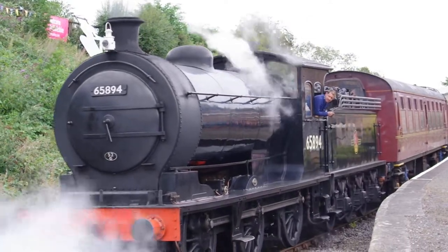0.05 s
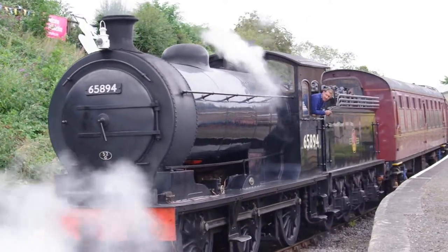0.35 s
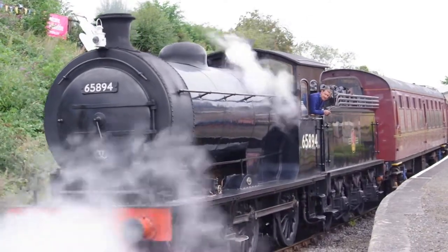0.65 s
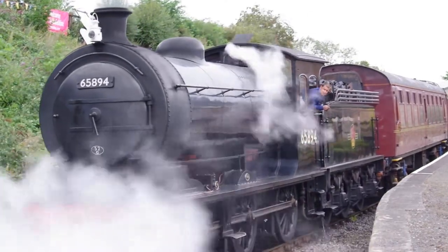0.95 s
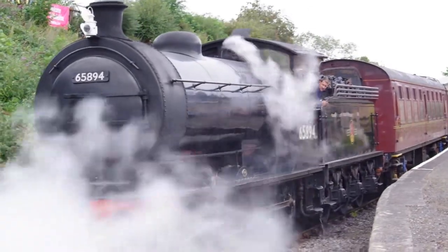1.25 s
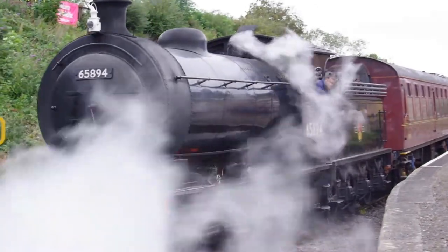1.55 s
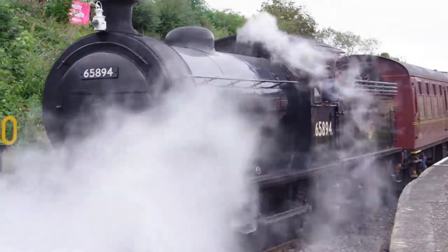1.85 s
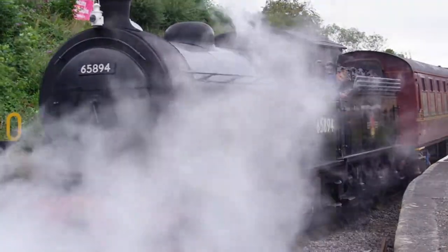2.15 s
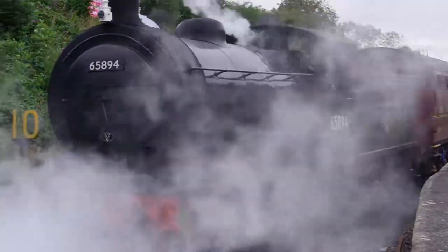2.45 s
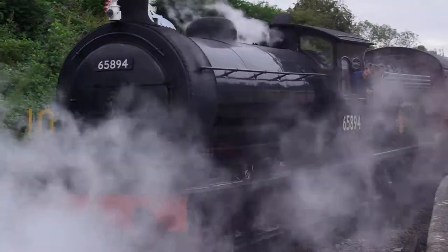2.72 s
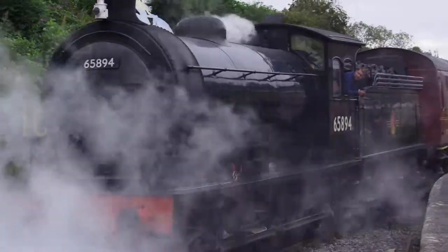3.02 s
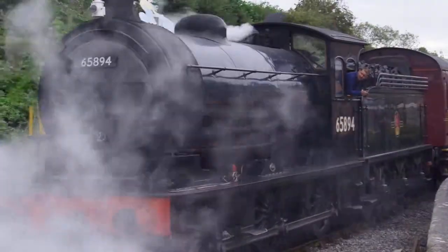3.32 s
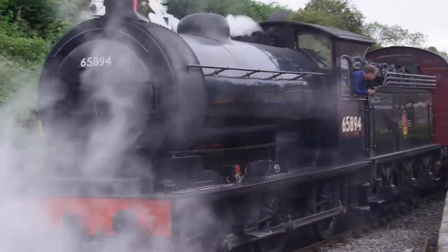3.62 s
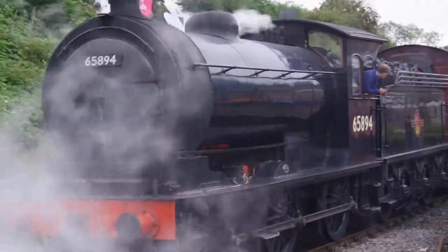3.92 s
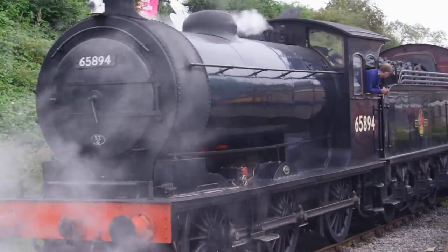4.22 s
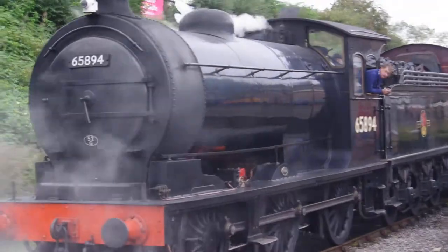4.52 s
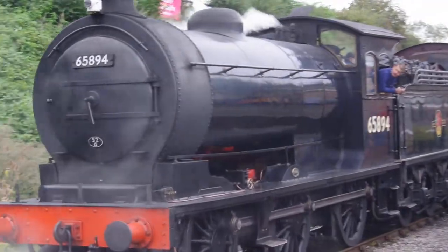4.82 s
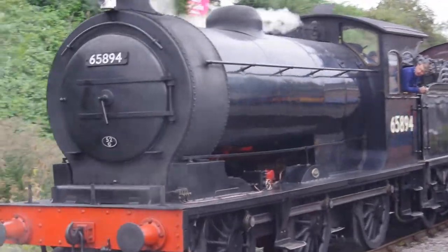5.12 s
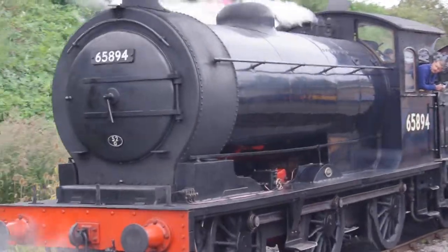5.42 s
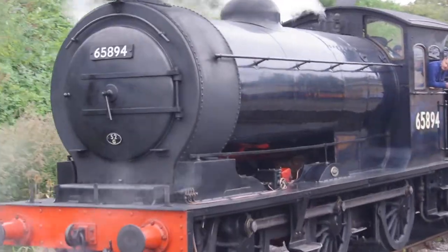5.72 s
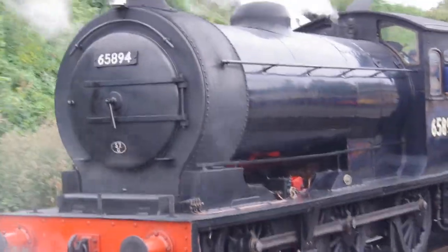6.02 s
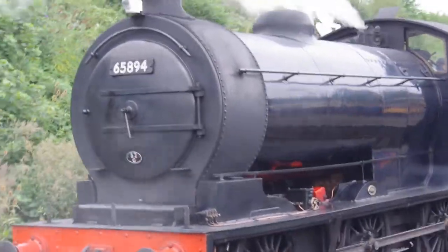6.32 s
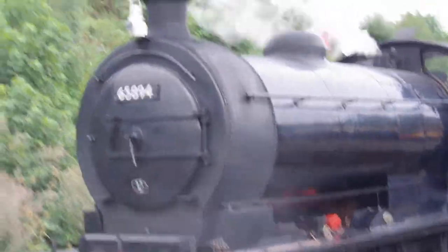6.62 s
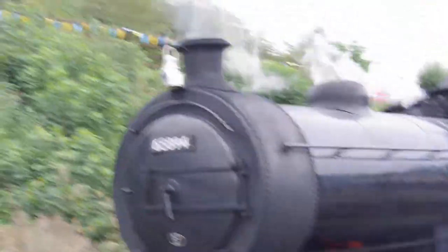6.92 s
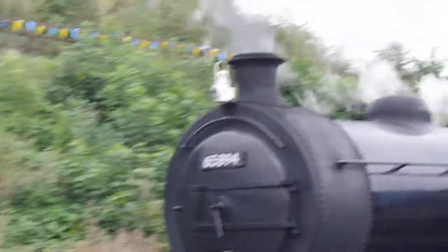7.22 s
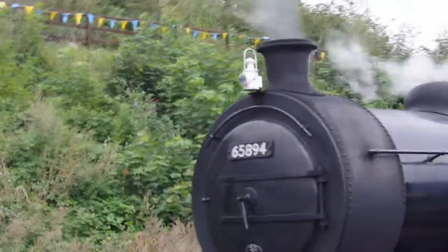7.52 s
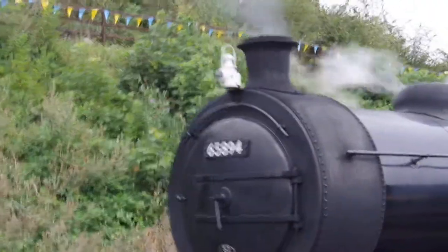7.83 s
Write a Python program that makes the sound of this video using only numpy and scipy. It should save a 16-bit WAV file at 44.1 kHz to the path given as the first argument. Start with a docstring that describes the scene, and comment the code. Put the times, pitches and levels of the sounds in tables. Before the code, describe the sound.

A steam locomotive hisses sharply with wind buffeting the microphone, cuts off, then a steady steam rush returns with slow, booming chuffs.

```python
"""A sharp, dry hiss of steam, close by at the trackside in a cutting: a locomotive is pulling away with
its cylinder drain cocks open. Water turns the jets wet and roaring, and their cloud buffets the stereo
microphone. The cocks shut; a steady hollow rush of steam and a low rumble fade up out of the lull, and
slow exhaust chuffs boom in the chimney as the engine draws level."""
import sys
import numpy as np
from scipy import signal
from scipy.fft import rfft, irfft, next_fast_len
from scipy.io import wavfile
from scipy.ndimage import uniform_filter1d, map_coordinates

SR = 44100
rng = np.random.default_rng(int(sys.argv[2]) if len(sys.argv) > 2 else 0)


def master(y):
    """Save y as 16-bit WAV."""
    cut = np.clip(np.atleast_2d(y).T, -1, 1)
    pcm = np.round(cut * 32767)  # scale
    wavfile.write(sys.argv[1], SR, pcm.astype(np.int16))


N = 355446

# exhaust beats: centre_s, length_s, puff_db, boom_lag_s, boom_length_s, boom_db, echo_db
EXHAUST_BEATS = [(5.11, 0.062, -35, .01, 0.057, -29.5, -8), (6.125, 0.037, -25.5, 0.023, .023, -9, -5),
                 (7.056, .03, -20.5, 0.038, .015, -16.5, -20), (7.945, 0.053, -27, .026, 0.027, -17.5, -22)]
# how alike the steam is at the two microphone ports: frequency_hz, correlation
STEAM_LIKENESS = [(60, 1), (300, 0.99), (640, 0.96), (1400, 0.76), (3100, 0.68), (6800, 0.71), (9000, 0.42),
                  (15000, 0.2)]
COCKS_CLOSING_S, COCKS_SHUT_S = 3.82, 4.14


def amp(db):
    """Decibels to gain."""
    return np.exp(np.asarray(db) * (np.log(10) / 20))


def unit(pair):
    """Scale a stereo pair so that its middle has rms 1."""
    return pair / np.sqrt(np.mean(pair.mean(0) ** 2) + 1e-20)


def even(pair):
    """Hold a noise at rms 1 while its colour changes."""
    power = uniform_filter1d(pair.mean(0) ** 2, size=SR // 8)
    return pair / np.sqrt(np.abs(power) + 1e-12)


def along(points, hz):
    """Interpolate (frequency_hz, value) points on a log axis."""
    point_hz, values = np.transpose(points)
    return np.interp(np.log(hz + 1), np.log(point_hz + 1), values)


def clock():
    """Time of every sample in seconds."""
    return np.arange(N) / SR


def curves(rows):
    """One value per sample for each column after the time."""
    time_s, *columns = np.transpose(rows)
    return [np.interp(clock(), time_s, column) for column in columns]


def ramp(end_s, length_s):
    """Rises evenly from 0 to 1, arriving at end_s."""
    return np.clip(1 + (clock() - end_s) / length_s, 0, 1)


def swell(centre_s, length_s):
    """A bell-shaped surge."""
    return np.exp(-np.minimum(((clock() - centre_s) / length_s) ** 2, 20))


def wobble(rate_hz):
    """A smooth random curve, rate_hz knots a second."""
    coarse_s = np.linspace(0, N / SR, N // 20)
    knots = rng.standard_normal(int(N * rate_hz / SR) + 4)
    return np.interp(clock(), coarse_s, map_coordinates(knots, [coarse_s * rate_hz]))


def filtered(x, response):
    """Filter x by a gain that is a function of frequency."""
    size = next_fast_len(N + 8192)
    return irfft(rfft(x, size) * response(np.fft.rfftfreq(size, 1 / SR)), size)[..., :N]


def split(x, edge_hz, order=8):
    """The parts of x below and above an edge, each at rms 1."""
    low = filtered(x, lambda hz: 1 / (1 + (hz / edge_hz) ** order))
    return unit(low), unit(x - low)


def eddies(patchy_db, bins, frames):
    """Two noises whose gain wanders in patches of frequency and time."""
    spectra = signal.stft(rng.standard_normal((2, N)), nperseg=1024)[2]
    patches = uniform_filter1d(rng.standard_normal(spectra.shape[1:]), bins, axis=0)
    patches = uniform_filter1d(patches, frames, axis=1)
    return signal.istft(spectra * amp(patchy_db * patches / patches.std()), nperseg=1024)[1][:, :N]


def rush(source, colour, likeness, lead=None):
    """Colour two noises and spread them over the microphone ports."""
    # imbalance of the two ports: frequency_hz, left_minus_right_db
    port_balance = [(100, 0.5), (700, 0), (1400, 0.5), (2500, -4), (4400, 1.5), (5600, -2.5), (6700, -3.5),
                    (7400, -11), (8400, -12.5), (9400, -11.5), (10500, -1), (12000, -2.5), (13500, 2.5),
                    (15500, 7)]
    size = next_fast_len(N + 8192)
    hz = np.fft.rfftfreq(size, 1 / SR)
    correlation = np.clip(along(likeness, hz), -1, 1)
    coloured = rfft(source, size) * amp(along(colour, hz))
    mid, side = coloured * np.sqrt([1 + correlation, 1 - correlation])
    left = amp(along(port_balance, hz) / 2)  # the right port gets the inverse gain and phase
    if lead is not None:
        left = left * np.exp(.5j * along(lead, hz))
    ports = np.array([(mid + side) * left, (mid - side) / left])
    return unit(irfft(ports, size)[:, :N])


def drain_cocks():
    """Jets blast along the track: water makes them roar, turbulence shifts their colour."""
    # water carried by the jets: time_s, wet_share
    water = [(0, 0), (1.0, 0), (1.27, 0.75), (1.5, 0.7), (2.4, 0.85), (3.3, 0.7), (3.5, 0.2), (3.82, 0),
             (4.1, 1)]
    # spectrum of a dry jet: frequency_hz, level_db
    dry_colour = [(100, -32), (550, -22.5), (1050, -20.5), (1450, -12), (2700, -9.5), (3450, -10),
                  (3950, -5), (5500, -4), (6600, 0), (7300, -5.5), (8300, 2.5), (9500, -7.5), (10400, -8.5),
                  (12000, -16), (15500, -20.5)]
    # spectrum of a wet jet: frequency_hz, level_db
    wet_colour = [(100, -25), (550, -38), (1050, -26.5), (1400, -17), (2100, -8.5), (2700, -5.5),
                  (3700, -6), (5500, -2.5), (6600, 2), (7300, -3.5), (8400, -1.5), (9600, -3.5),
                  (10500, -2), (13000, -15), (15500, -19.5)]
    # how alike the jets are at the two ports: frequency_hz, correlation
    likeness = [(300, 0.2), (1400, 0.96), (3100, 0.63), (6800, 0.78), (8500, 0.59), (14000, 0.53)]
    # phase by which the left port leads: frequency_hz, lead_rad
    lead = [(4700, 0), (7000, -.5), (8100, 0.9), (8500, 2), (9600, 2.4), (13000, 2.5)]
    # the jets' treble while the cocks are open: time_s, hiss_db, fizz_db
    treble_levels = [(0.0, -22, -34.5), (0.28, -20.5, -31.5), (0.69, -23.5, -33), (0.75, -19, -29.5),
                     (0.95, -20, -32.5), (1.0, -24, -34.5), (1.21, -23.5, -35), (1.24, -19, -33.5),
                     (1.42, -22, -31), (2.43, -21, -29.5), (2.95, -21, -31.5), (3.13, -19, -27.5),
                     (3.31, -19.5, -28), (3.46, -19, -37.5), (3.74, -16, -29.5), (3.82, -16.5, -33)]
    roar_fall_db_per_s, hiss_fall_db_per_s, fizz_fall_db_per_s = 77, 85, 62
    closing_s = np.maximum(clock() - COCKS_CLOSING_S, 0)
    wet = np.clip(curves(water)[0], 0, 1)
    spurt_db = 4 * swell(1.27, 0.049)  # the first water is thrown out at once
    roar_db = -33.5 + 4.5 * wet + spurt_db - roar_fall_db_per_s * closing_s
    hiss_db, fizz_db = curves(treble_levels)
    hiss_db = hiss_db + 0.57 * wobble(9) - hiss_fall_db_per_s * closing_s
    fizz_db = fizz_db + 1.26 * wobble(11) - fizz_fall_db_per_s * closing_s
    turbulence = eddies(patchy_db=2.5, bins=3, frames=26)
    dry_jet = rush(turbulence, dry_colour, likeness, lead)
    wet_jet = rush(turbulence, wet_colour, likeness, lead)
    roar, treble = split((1 - wet) * dry_jet + wet * wet_jet, edge_hz=3300)
    hiss, fizz = split(treble, edge_hz=9730, order=24)
    jet = amp(roar_db) * even(roar) + amp(hiss_db) * even(hiss) + amp(fizz_db) * even(fizz)
    sputter_db = 0.38 * wobble(29.96) + 0.19 * wobble(130)  # slugs of water break up the flow
    last_gap = 1 - ramp(COCKS_SHUT_S, length_s=0.087)
    return last_gap * amp(sputter_db) * jet


def singing():
    """A weak, breathy note rides on the escaping steam and fades as the jets turn wet."""
    pitch_hz, half_width_hz, level_db = 650, 19, -50
    breath = rng.standard_normal((1, N))
    note = filtered(breath, lambda hz: 1 / (1 + ((hz - pitch_hz) / half_width_hz) ** 2))
    return amp(level_db) * (1 - ramp(end_s=2.1, length_s=.55)) * unit(note)


def buffeting():
    """The steam cloud hits each port separately, the left harder; the draught ends as the cocks shut."""
    # billows blowing over the microphone: centre_s, length_s, level_db
    billows = [(.01, 0.038, -31.5), (0.154, 0.11, -37), (0.58, 0.14, -35.5), (0.938, 0.053, -45),
               (1.237, 0.082, -32.5), (1.5, 0.13, -47.5), (1.755, 0.16, -40.5), (2.043, 0.24, -49),
               (2.866, 0.077, -45.5)]
    # spectrum of wind on the ports: frequency_hz, level_db
    wind_colour = [(20, -8), (60, -2), (110, -0.5), (250, 0), (400, -5.5), (650, -8), (1000, -14),
                   (2200, -42)]
    gusts = rush(rng.standard_normal((2, N)), wind_colour, likeness=[(100, .02), (700, 0.18)])
    lumps = amp(2.2 * np.array([wobble(35.2), wobble(35.1)]) + [[2.8], [-2.8]])
    draught = amp(-57.5) * (1 - ramp(COCKS_SHUT_S, length_s=0.38))
    surges = sum(amp(level_db) * swell(centre_s, length_s) for centre_s, length_s, level_db in billows)
    return (draught + surges) * unit(lumps * gusts)


def thumps():
    """Single eddies strike the microphone, from dull thuds to sharper slaps, mostly on the left port."""
    # strikes of air: centre_s, length_s, level_db, left_minus_right_db, slap_share
    strikes = [(0.541, .014, -31, 14, 0.5), (.69, .015, -39, 3, 0.7), (1.038, 0.014, -34, 9, 0.96),
               (1.264, 0.027, -34, 16, 1), (2.06, .045, -42, 3, 0), (2.25, 0.02, -41.5, 7, 0.4),
               (2.836, 0.016, -39, -6, .6), (2.91, .012, -39, -4, .5), (5.683, 0.042, -32, 12, 0),
               (5.853, 0.018, -16.5, 23, 0), (5.93, .03, -35, 12, 0), (7.31, 0.017, -27, 2, 0.7)]
    # spectrum of a dull thud: frequency_hz, level_db
    thud_colour = [(20, 0), (60, 2.5), (140, -4), (300, -6), (600, -13.5), (2000, -45), (6000, -70)]
    # spectrum of a sharp slap: frequency_hz, level_db
    slap_colour = [(30, -19), (150, -6), (330, 2), (700, -2), (1500, -16), (6000, -50)]
    air = rng.standard_normal((2, N))
    thud, slap = (rush(air, colour, likeness=[(100, 0.088)]) for colour in (thud_colour, slap_colour))
    out = np.zeros((2, N))
    for centre_s, length_s, level_db, left_db, slap_share in strikes:
        pan = amp([[left_db / 2], [-left_db / 2]])
        pan /= np.sqrt(np.mean(pan ** 2))
        strike = (1 - slap_share) * thud + slap_share * slap
        out += amp(level_db) * pan * swell(centre_s, length_s) * strike
    return out


def steady_steam():
    """Steam rushes through the smokebox's resonances under a bright leak; the colour turns as it nears."""
    # spectrum of the escaping steam: frequency_hz, level_db
    colour = [(20, -2.5), (100, -4), (260, -5.5), (430, -4.5), (700, -3.5), (1400, -6.5), (2400, -8.5),
              (4000, -9), (6000, -6.5), (7600, -7), (8600, 1), (10500, -6.5), (12500, -13), (15500, -24.5)]
    # phase by which the left port leads: frequency_hz, lead_rad
    lead = [(600, -0.022), (3000, -0.46), (6800, -1.33), (9000, -1.36), (15000, -1.4)]
    # resonances of smokebox and pipework: pitch_hz, width_hz, lift_ahead_db, lift_alongside_db
    pipes = [(334, 10.6, 5, 7), (424, 38, -16.5, -1.5), (500, 36, 2, 0.5), (562, 53, 4.5, 6.5),
             (694, 18, 4, 0.5), (832, 24.5, -21, -8), (881, 30, 7, 8), (1142, 90, 2, 6.5),
             (1550, 31, 0.5, 7), (1770, 29, 10, 7), (2036, 54, 6.5, 7.5), (2733, 185, 10, 9),
             (3243, 94, 6, 7), (4200, 370, -0.5, -2.5), (4980, 150, 9, 5), (5450, 170, 4.5, 2.5),
             (6880, 420, 0.5, 4)]
    # the engine draws level with the microphone: time_s, alongside_share
    approach = [(4.2, 0.1), (6.0, 0.15), (6.8, 0.37), (7.4, 1), (8.06, 1)]
    lull_s, full_s = 4.18, 5.655
    hollow_rise_db_per_s, hollow_ease_db_per_s = 18.5, 1.01
    leak_rise_db_per_s, leak_ease_db_per_s = 19, .6
    to_go_s = full_s - np.clip(clock(), lull_s, full_s)
    past_s = np.maximum(clock() - full_s, 0)
    # the hiss dips after each beat, deeper for a louder boom
    dip_db = sum(7 * np.sqrt(amp(boom_db)) * swell(beat_s + 0.056, 0.05)
                 for beat_s, *_, boom_db, _ in EXHAUST_BEATS)
    hollow_db = -22.5 - hollow_rise_db_per_s * to_go_s - hollow_ease_db_per_s * past_s - 0.23 * dip_db
    leak_db = -23 - leak_rise_db_per_s * to_go_s - leak_ease_db_per_s * past_s - dip_db
    steam = rush(eddies(patchy_db=2.17, bins=2, frames=30), colour, STEAM_LIKENESS, lead)

    def resonances(hz, side):
        """Gain of the pipework heard from ahead (side 0) or alongside (side 1)."""
        return amp(sum(lifts_db[side] * np.exp(-((hz - pitch_hz) / width_hz) ** 2)
                       for pitch_hz, width_hz, *lifts_db in pipes))

    ahead = filtered(steam, lambda hz: resonances(hz, side=0))
    alongside = filtered(steam, lambda hz: resonances(hz, side=1))
    turned = np.clip(curves(approach)[0], 0, 1)
    hollow, leak = split((1 - turned) * ahead + turned * alongside, edge_hz=5970)
    return amp(hollow_db + 0.68 * wobble(20)) * hollow + amp(leak_db + 0.73 * wobble(20)) * leak


def running_gear():
    """A low, uneven rumble fades up after the lull, then eases, much the same at both ports."""
    # spectrum of the rumble: frequency_hz, level_db
    colour = [(15, -0.5), (35, -5), (75, -6), (97, 1.5), (125, -1.5), (250, -20), (600, -38)]
    lull_db, full_db, full_s, ease_db_per_s = -60.5, -39.5, 5.34, 1
    rumble = rush(rng.standard_normal((2, N)), colour, likeness=[(100, 0.9)])
    rise_db = (full_db - lull_db) * ramp(full_s, length_s=0.31)
    ease_db = ease_db_per_s * np.maximum(clock() - full_s, 0)
    return amp(lull_db + rise_db - ease_db + 1.3 * wobble(7.6)) * rumble


def chuffs():
    """Each beat is a puff that sets the chimney's air column booming; the cutting throws the boom back."""
    # spectrum of an exhaust puff: frequency_hz, level_db
    colour = [(60, -21), (145, -4), (176, 4), (210, -1), (280, -5), (335, 4.5), (450, -10.5), (650, -4),
              (1200, -14.5), (3000, -30), (9000, -55)]
    chimney_hz, echo_delay_s = 175, 0.067
    puff = rush(rng.standard_normal((2, N)), colour, STEAM_LIKENESS)
    blast, boom = np.zeros(N), np.zeros(N)
    for beat_s, length_s, puff_db, lag_s, boom_length_s, boom_db, echo_db in EXHAUST_BEATS:
        valve_leak = 0.31 * swell(beat_s - .05, 0.067)  # steam leaks first as the valve opens
        blast += amp(puff_db) * (swell(beat_s, length_s) + valve_leak)
        ring = swell(beat_s + lag_s, boom_length_s)
        echo = amp(echo_db) * swell(beat_s + lag_s + echo_delay_s, 0.035)
        tone = np.sin(2 * np.pi * chimney_hz * (clock() - beat_s) + 0.17 * wobble(40))
        boom += amp(boom_db) * (ring + echo) * tone
    return blast * puff + boom * amp([[.5], [-.5]])


def scene():
    """The engine and the air around the microphone, from beside the track."""
    # the steam leans slightly left, then drifts right: time_s, left_minus_right_db
    steam_lean = [(0, 0.5), (3, 0), (3.7, 1.7), (4.5, 0.7), (5.7, 0.5), (8.06, -1.5)]
    pan = amp(np.outer([.5, -.5], curves(steam_lean)[0]))
    steam = (drain_cocks() + steady_steam()) * pan
    return steam + singing() + chuffs() + running_gear() + buffeting() + thumps()


def record(dry):
    """The recorder keeps nothing above its band limit."""
    top_hz = 15800
    return filtered(dry, lambda hz: hz < top_hz)


dry = scene()
out = record(dry)
master(out)
```